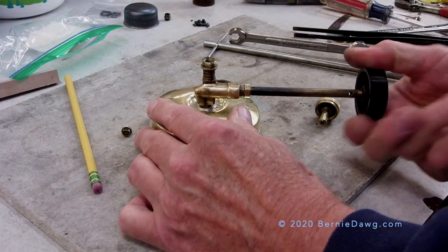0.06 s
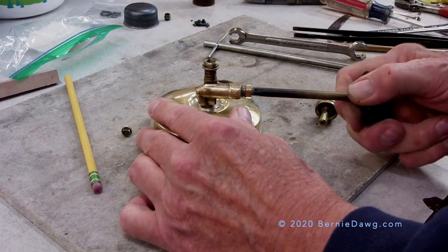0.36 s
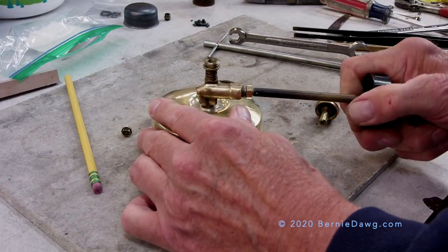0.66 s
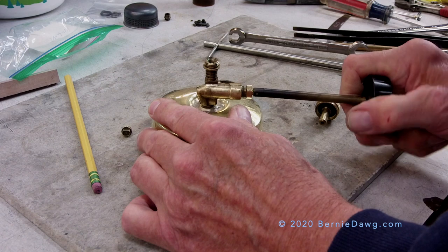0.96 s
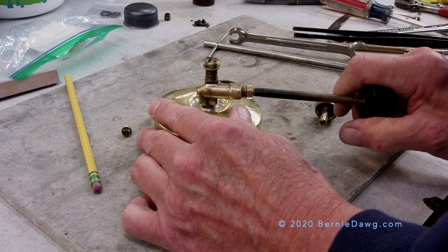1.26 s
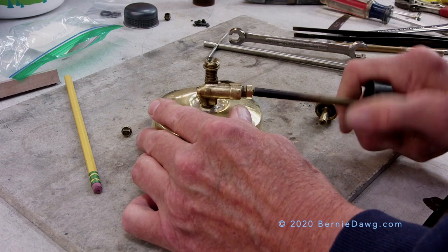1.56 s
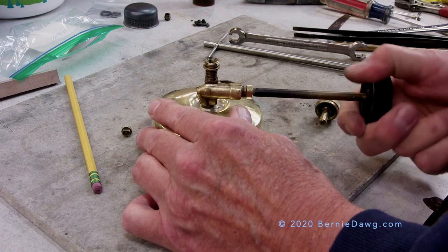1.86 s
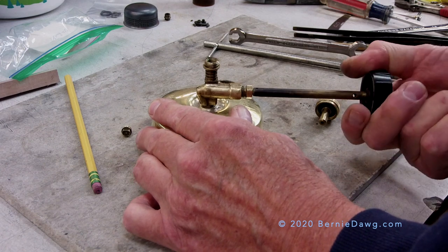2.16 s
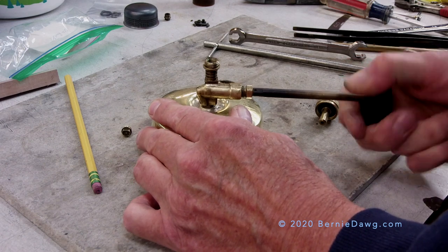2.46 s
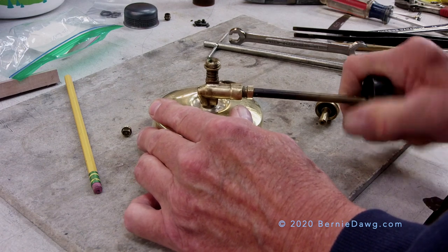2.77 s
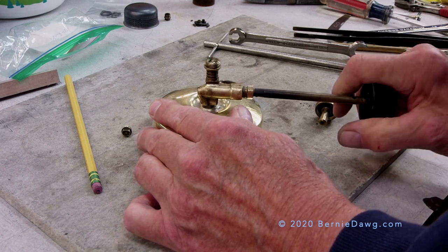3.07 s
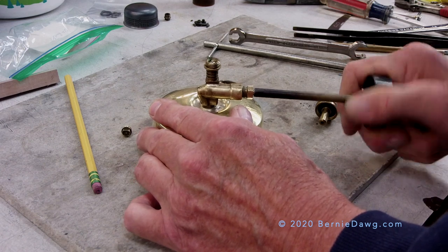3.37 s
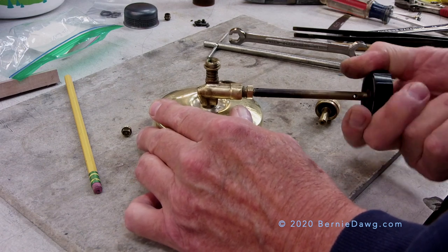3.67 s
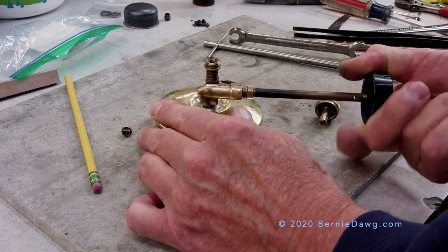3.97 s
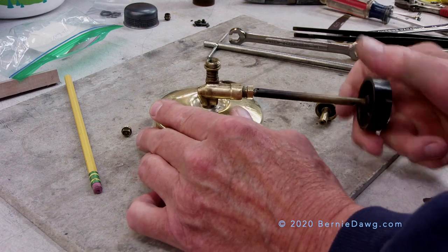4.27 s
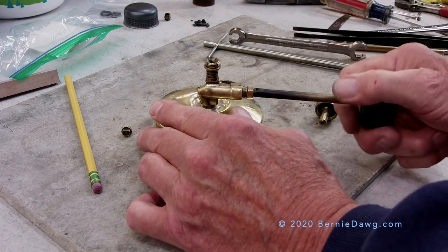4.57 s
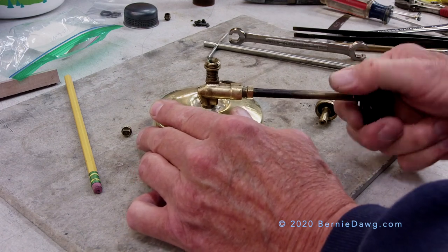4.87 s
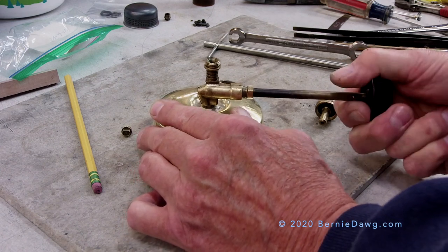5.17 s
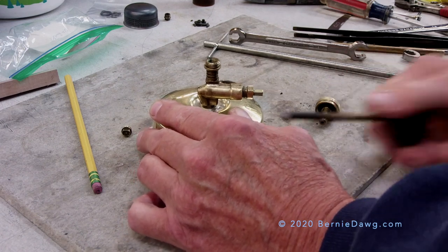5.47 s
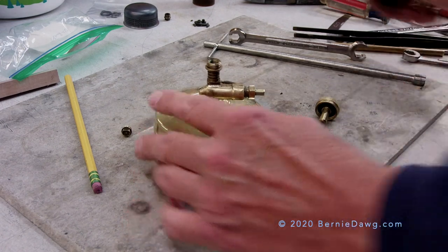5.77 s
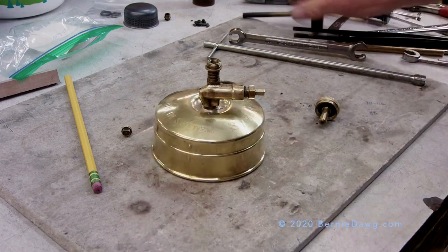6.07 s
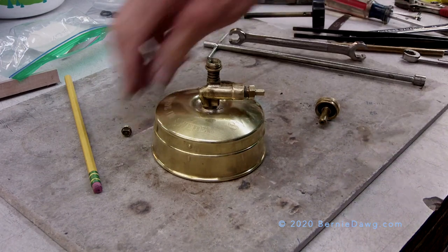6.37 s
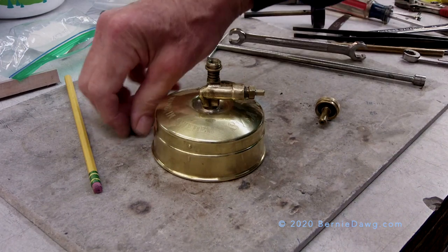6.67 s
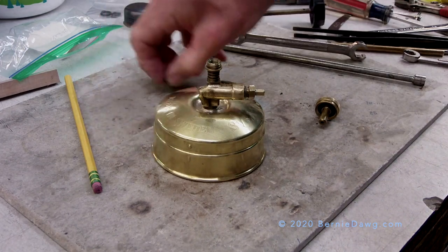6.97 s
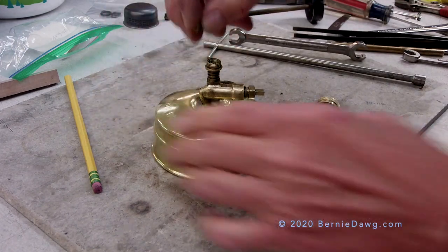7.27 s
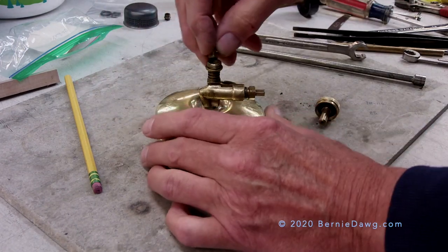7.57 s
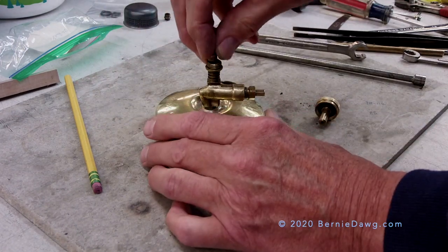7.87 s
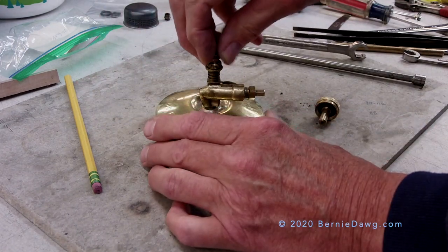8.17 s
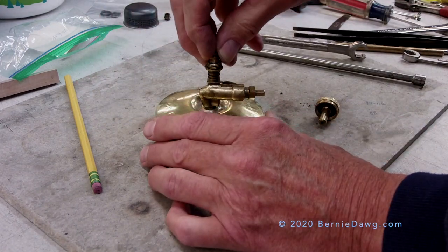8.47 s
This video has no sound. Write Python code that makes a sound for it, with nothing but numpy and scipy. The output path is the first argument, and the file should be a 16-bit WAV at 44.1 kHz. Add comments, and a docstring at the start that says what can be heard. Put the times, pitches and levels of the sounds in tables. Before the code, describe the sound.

High metal squeaks from a turning brass valve, a sharp clatter of tools and a few small clicks in a quiet workshop.

```python
"""Brass stove on a workbench

A quiet workshop, one microphone close to the bench. A key turns the spindle of a small brass stove;
it sticks and slips, squeaking at each twist of the wrist. Dropped among the tools, the key chatters
on steel and bounces on the bench. Fingers fit a small cap with two clicks and a chirp.
The walls answer briefly; room hum and microphone hiss lie underneath."""
import sys
import numpy as np
from scipy import signal
from scipy.fft import rfft, irfft, next_fast_len
from scipy.io import wavfile
from scipy.ndimage import uniform_filter1d

SR = 44100
rng = np.random.default_rng(int(sys.argv[2]) if len(sys.argv) > 2 else 0)


def master(y):
    """Save y as 16-bit WAV."""
    cut = np.clip(np.atleast_2d(y).T, -1, 1)
    pcm = np.round(cut * 32767)  # scale
    wavfile.write(sys.argv[1], SR, pcm.astype(np.int16))


N = 380583

# low rumble of the workshop: (frequency [Hz], relative level [dB])
RUMBLE_SPECTRUM = [(8.8, -5), (15, 7), (76, -9), (92, -13), (123, -5.5), (149, -16.5), (180, -11),
                   (214, -14.5), (281, -10), (315, -13.5), (412, -8), (520, -16), (735, -18), (1500, -22.5),
                   (1950, -38), (3300, -120)]
# the microphone's own hiss: (frequency [Hz], relative level [dB])
HISS_SPECTRUM = [(1450, -15), (1650, -4), (1900, -8), (2300, -5), (3500, -7.5), (5000, -6.5), (7000, -0.5),
                 (8500, 2), (9100, 1), (9600, -10), (12000, -9.5), (13000, -17.5), (15000, -23)]
# narrow hums and whines in the room: (frequency [Hz], width [Hz], level [dB])
ROOM_HUMS = [(31.2, 22, -70), (120.5, 7.8, -75), (185.4, 5.1, -78.5), (276.2, 6, -74.5),
             (372.4, 5.6, -73.5), (447, 55, -70.5), (562, 10, -75.5), (751, 66, -71.5), (2829, 72, -69),
             (8920, 33, -65.5)]
# one row a squeak, the last two from the cap: (level offset [dB], brightness [dB], whistle [dB],
# roughness [0-1], opening rasp [0-1], path of (time [s], slip rate [Hz]))
SQUEAKS = [ (-3.5, -1.5, 0, 0.52, .6, [(.633, 3955), (.645, 3984), (.654, 3515), (.665, 1730), (.682, 975),
           (.69, 756)]), (-2, -8, -3, 0.37, 0.45, [(.759, 1215), (.776, 2395), (.791, 2392), (.823, 956),
           (.84, 733)]), (-0.5, -1.5, 1, .35, 0.69, [(.875, 1173), (.893, 1766), (.92, 1864), (.942, 998),
           (.957, 717)]), (0, 0, 0.5, .38, 0.595, [(1.035, 1402), (1.055, 1807), (1.074, 1790),
           (1.087, 1477), (1.12, 1110), (1.145, 1615), (1.165, 2560), (1.192, 3260), (1.25, 3370),
           (1.28, 3188), (1.32, 2218), (1.368, 738)]), (3, 7.5, 9, 0.44, .8, [(1.831, 4245), (1.875, 4370),
           (1.903, 4010), (1.918, 3060), (1.937, 2800), (1.96, 3330), (1.985, 3986), (2.031, 3910)]),
           (0, -2, 8.5, 0.52, 0.66, [(2.037, 3290), (2.05, 3220), (2.083, 3986)]),
           (-0.5, 0, 1.5, .58, 0.74, [(2.789, 4004), (2.806, 4100), (2.819, 2362), (2.833, 1457),
           (2.857, 2540), (2.877, 3340), (2.915, 3827), (2.968, 3890), (2.995, 3712), (3.022, 3270),
           (3.078, 1820), (3.112, 809)]), (1.5, 6.5, 6, .5, 0.47, [(3.548, 3425), (3.56, 4440),
           (3.575, 4430), (3.606, 4000), (3.615, 3050), (3.63, 4230), (3.65, 4200)]),
           (6, 0, -2, .5, 0.1, [(3.673, 4340), (3.688, 4370), (3.697, 3927), (3.734, 4120)]),
           (1.5, -17, 1, .15, .45, [(3.737, 3990), (3.763, 3950)]), (-2.5, -1, 1, .45, .3, [(8.134, 4650),
           (8.143, 4520)]), (-6.5, -2, 5, 1, .6, [(8.161, 4120), (8.182, 4550)])]
# how the metal answers the slips: (slip rate [Hz], level [dB], upper over lower resonances [dB])
SLIP_RESPONSE = [(730, -48.5, -8), (1070, -44, -2.5), (1800, -42.5, 0.5), (2560, -42.5, 8),
                 (2800, -39, -17), (3260, -36.5, -20.5), (3360, -39, -2.5), (3880, -37, -2),
                 (4050, -40, 11), (4500, -42, 23), (4450, -40, 10)]
# resonances of spindle and valve: (frequency [Hz], width [Hz], gain [dB])
SPINDLE_MODES = [(1110, 1900, 4.5), (3020, 190, 2), (3130, 214, 16.5), (3660, 510, 1.5), (4500, 91, 9.5),
                 (7040, 690, 3), (7183, 480, 17), (7870, 220, 10), (8800, 540, 17), (11370, 500, -41)]
# overall tone colour of the squeaks at the microphone: (frequency [Hz], gain [dB])
SQUEAK_COLOUR = [(800, 6), (1150, 3), (1450, -2.5), (1900, -7.5), (2700, -1), (9000, -1), (10200, 1),
                 (12000, -0.5), (12800, -13), (15000, 6)]
# fingers grip, brush and nudge: (time [s], level [dB], centre [Hz], width [octaves], length [s])
FINGER_TOUCHES = [(2.533, -51, 478, 0.18, 0.022), (2.771, -45.5, 364, 1.2, 0.023),
                  (4.47, -55, 2500, 1.2, 0.01), (4.495, -55.5, 900, 2.2, 0.022),
                  (5.569, -53, 4400, 0.33, .015), (5.902, -56.5, 5070, 0.081, 0.021),
                  (6.673, -56.5, 3430, 1, 0.025), (6.735, -49.5, 3720, 0.93, 0.013),
                  (6.821, -55, 2660, 1.1, 0.05), (7.933, -51.5, 460, 0.92, 0.098),
                  (8.021, -44.5, 3600, .6, 0.036), (8.129, -47, 9900, .12, 0.024)]
# the key's tip rings as it lands: (frequency [Hz], relative level [dB], t60 [s])
KEY_TIP_MODES = [(7800, -12, .008), (8670, 13, 0.013), (12100, -7, 0.027)]
# modes of the bench: (frequency [Hz], relative level [dB], t60 before the ring factor [s])
BENCH_MODES = [(85, -24, 0.1), (149, -19, 0.15), (253, -8.5, 0.025), (385, -8.5, 0.036), (476, -1, 0.027),
               (787, 6, 0.013), (1064, -0.5, .02), (1197, -3, 0.024), (1634, -3.5, 0.025),
               (2480, -3, 0.0095)]
# the key strikes the tools, steel on steel: (time [s], peak level [dB])
STEEL_BLOWS = [(6.1720, -3.5), (6.213, -10), (6.2456, -27), (6.2604, -20), (6.2697, -38), (6.2940, -21.5),
               (6.3284, -31), (6.3374, -27)]
# colour of the steel: (frequency [Hz], gain [dB])
STEEL_COLOUR = [(1200, -2), (2300, -11), (2900, -9.5), (3400, -8.5), (3900, 1.5), (4500, 1), (5300, -8.5),
                (6500, -10.5), (7700, -11.5), (8700, -9), (10000, -31), (12400, -18), (15000, -15)]
# the cap meets the stove: (time [s], peak level [dB], brightness limit [Hz], ring factor [ratio])
CAP_CLICKS = [(7.9421, -25.5, 2000, 1.0), (7.953, -31, 4000, .15), (8.0055, -32, 7000, 0.097),
              (8.0080, -20.5, 4470, 0.058), (8.015, -30, 8000, 0.19), (8.031, -32, 3500, 0.2)]
# modes of the cap and its seat: (frequency [Hz], relative level [dB], t60 before the ring factor [s])
CAP_MODES = [(825, -17, 0.059), (1648, -1.5, 0.07), (2300, -6, 0.052), (2886, -2, 0.072), (3580, 0, 0.024),
             (4930, -8, .012), (6500, 0, 0.06), (7030, 8.5, 0.065), (8400, 6, 0.03)]
# decay of the workshop's reflections: (frequency [Hz], t60 [s])
WORKSHOP_DECAY = [(150, 0.22), (700, 0.46), (2000, 0.39), (4000, 0.27), (8000, 0.2), (14000, 0.93)]
# colour of those reflections at the microphone: (frequency [Hz], gain [dB])
WORKSHOP_COLOUR = [(100, -3), (300, 4.5), (700, -4), (1200, 4), (1450, 2), (1700, 5), (2200, 5.5),
                   (3000, -3), (4000, -0.5), (5500, 1.5), (8500, 7), (10000, -4.5), (12000, -7),
                   (14000, -18)]

BAND_LIMIT_HZ = 15200


def amp(db):
    """Decibels to gain."""
    return 10 ** (np.asarray(db) / 20)


def unit(x):
    """Scales to rms 1."""
    return x / np.sqrt(np.mean(x ** 2) + 1e-20)


def read(points, hz):
    """Reads a table on a log-frequency axis."""
    f, value = np.transpose(points)
    return np.interp(np.log(hz + 1), np.log(f + 1), value)


def add(mix, s, sound):
    """Mixes a sound in at time s."""
    part = mix[round(s * SR):][:len(sound)]
    part += sound[:len(part)]


def lowpass(hz, edge_hz, order=2):
    """Gain of a smooth low-pass."""
    return 1 / np.sqrt(1 + (hz / edge_hz) ** (2 * order))


def noise(gain, count=N):
    """Noise of rms 1 with the given spectrum."""
    return unit(irfft(rfft(rng.standard_normal(count)) * gain, count))


def waver(count, rate_hz):
    """Random drift of rms about 1, up to the given rate."""
    size = next_fast_len(2 ** 14 + count)
    return noise(lowpass(np.fft.rfftfreq(size, 1 / SR), rate_hz), size)[:count]


def room_tone(rumble_db=-57, hiss_db=-55):
    """The still workshop: low rumble, narrow hums and the microphone's hiss."""
    f = np.fft.rfftfreq(N, 1 / SR)
    rumble = amp(rumble_db) * noise(amp(read(RUMBLE_SPECTRUM, f)) * lowpass(f, 1228, order=8))
    hiss = amp(hiss_db) * noise(amp(read(HISS_SPECTRUM, f)) * (1 - lowpass(f, 720, order=8)))
    hums = sum(amp(db) * noise(lowpass(f - hz, width / 2)) for hz, width, db in ROOM_HUMS)
    return rumble + hiss + hums


def twist(level_db, bright_db, whistle_db, roughness, rasp, path,
          break_s=0.015, fray_octaves_per_s=6.86, steady_smoothing=0.802, steady_db=2):
    """One twist of the wrist: a steady slip rate runs clean and loud, a gliding one frays."""
    times, rates = np.transpose(path)
    t = np.arange(times[0], times[-1] + 0.0025, 1 / SR)
    hz = np.interp(t, times, rates)
    breaking_loose = np.exp(-(t - t[0]) / break_s)
    glide = uniform_filter1d(abs(np.gradient(np.log2(hz))) * SR, size=400)
    steady = 1 - np.tanh(glide / fray_octaves_per_s)
    stumble = 0.45 * lowpass(hz, 1130, order=4)  # slow slips are rougher
    rough = roughness * (1 - steady_smoothing * steady) + rasp * breaking_loose + stumble
    at_hz, loud_db, upper_db = np.transpose(SLIP_RESPONSE)
    db = level_db + np.interp(hz, at_hz, loud_db) + steady_db * steady * (1 - breaking_loose)
    # the opening rasp excites all resonances alike
    tilt_db = (bright_db + np.interp(hz, at_hz, upper_db)) * (1 - rasp * breaking_loose)
    return t, hz, db, tilt_db, np.clip(rough, 0.06, 1), amp(whistle_db)


def stick_slip(hz, rough, whistle, drain=0.21, wander=0.0273, uneven=0.61, grit=0.17, scrape=0.29):
    """The force of sticking and slipping: a pulse train whose overtones fray in rough stretches."""
    n = len(hz)
    # slow slips come irregularly; quick ones lock to the metal and run steadily
    jitter = 120 / hz * waver(n, 700)
    cycles = np.cumsum(hz * (1 + rough * (jitter + wander * waver(n, 113)))) / SR
    edge_hz = 8500 * (1 + 0.15 * rough)  # smooth sliding has rounder slips
    edge_hz /= 1 + drain * rough * whistle ** 2  # a whistling upper mode drains the overtones
    slips = np.zeros(n)
    for k in range(1, 19):
        gain = lowpass(k * hz, edge_hz, order=5) * (k * hz < BAND_LIMIT_HZ)
        slips += gain * np.cos(2 * np.pi * k * cycles)
    rasp = rng.standard_normal(n + 1)
    friction = rough * (grit * rasp[:n] + scrape * np.diff(rasp))
    return cycles, unit(slips) * (1 + uneven * rough * waver(n, 590)) + friction


def free_modes(cycles, hz, whistle, throb=0.4, chime=0.14, slack_hz=6850, tighten=0.36):
    """Modes break free of the slips: one whistles, higher as the slips quicken; others flare by turns."""
    n = len(hz)
    whistle_hz = slack_hz + tighten * hz + 80 * waver(n, 65)
    singing = np.sin(2 * np.pi * np.cumsum(whistle_hz) / SR) * (1 + throb * np.cos(2 * np.pi * cycles))
    flares = sum(waver(n, 29) * np.sin(2 * np.pi * np.cumsum(mode_hz + 40 * waver(n, 44)) / SR)
                 for mode_hz, _, _ in SPINDLE_MODES[1:])
    return whistle * singing + chime * flares


def squeak(t, hz, db, tilt_db, rough, whistle, flutter_db=3.5, split_hz=6300, ripple=0.36, tank_s=0.0048):
    """Each slip kicks the resonances of the brass. Returns the start time and the sound."""
    n = len(t)
    cycles, drive = stick_slip(hz, rough, whistle)
    drive += rough * free_modes(cycles, hz, whistle)
    size = next_fast_len(n + 2048)
    f = np.fft.rfftfreq(size, 1 / SR)
    body = sum(amp(gain_db) * 1j * f * width / (mode_hz ** 2 - f ** 2 + 1j * f * width)
               for mode_hz, width, gain_db in SPINDLE_MODES)
    # the tank's many small modes make each gliding overtone stutter
    tank = rng.standard_normal(size) * np.exp(-np.arange(size) / SR / tank_s)
    body *= 1 + ripple * rfft(tank) / np.linalg.norm(tank)
    ringing = rfft(drive, size) * body * amp(read(SQUEAK_COLOUR, f))
    # the grip shares the energy between the lower and the upper resonances
    lower = lowpass(f, split_hz, order=8)
    upper = np.sqrt(1 - lower ** 2)
    upper_share = 1 / (1 + amp(-2 * tilt_db))
    sound = np.zeros(n)
    for band, share in (lower, 1 - upper_share), (upper, upper_share):
        part = irfft(ringing * band, size)[:n]
        power = abs(uniform_filter1d(part ** 2, size=300)) + 1e-12
        flutter = amp(flutter_db * np.sqrt(rough) * waver(n, 60))
        sound += part * np.sqrt(share / power) * flutter
    fade = np.clip(np.minimum((t - t[0]) / 0.0006, (t[-1] - t) / 0.0012), 0, 1)
    return t[0], sound * amp(db) * fade


def finger_touch(db, hz, octaves, length_s):
    """A soft scuff near the microphone: a quick swell of grainy noise that dies away."""
    t = np.arange(SR // 2) / SR
    f = np.fft.rfftfreq(len(t), 1 / SR)
    grains = rng.standard_normal(len(t)) * rng.exponential(1, len(t))
    band = np.exp(-0.5 * (np.log2((f + 1) / hz) / octaves) ** 2)
    scuff = unit(irfft(rfft(grains) * band, len(t)))
    age = 3 * t / length_s
    return amp(db) * scuff * age * np.exp(1 - age)


def strike(modes, peak_db, bright_hz, ring, crack, crack_s=0.0022, rise_s=0.0004, thin_hz=700):
    """A knock on key tip, bench or cap: a crack of contact, then modes whose decay time ring scales."""
    t = np.arange(SR // 4) / SR
    f = np.fft.rfftfreq(len(t), 1 / SR)
    colour = lowpass(f, bright_hz) * (1 - lowpass(f, thin_hz))
    sound = crack * noise(colour, len(t)) * np.exp(-t / crack_s)
    for k, (hz, db, t60) in enumerate(modes):
        swing = (-1) ** k * np.sin(2 * np.pi * hz * t * rng.uniform(1.0, 1.008))
        sound += amp(db - 60 * t / (t60 * ring)) * lowpass(hz, bright_hz, order=1) * swing
    sound *= 1 - np.exp(-t / rise_s)
    return amp(peak_db) * sound / abs(sound).max()


def steel_chatter(peak_db, centre_hz=4500, buzz=0.07, buzz_s=0.0037, low_hz=2400):
    """A blow runs along thin steel: high bending waves arrive first, so the click falls in pitch."""
    t = np.arange(2048) / SR
    f = np.fft.rfftfreq(len(t), 1 / SR)
    delay_s = 0.0048 * (np.sqrt(centre_hz / np.maximum(f, 500)) - 1)
    phase = -2 * np.pi * np.cumsum(delay_s) * f[1]
    bright_hz = 5900 + 17000 * amp(peak_db) ** 2  # harder blows are brighter
    low_cut = np.sqrt(1 - lowpass(f, low_hz, order=3) ** 2)
    gain = amp(read(STEEL_COLOUR, f)) * lowpass(f, bright_hz, order=6) * low_cut
    # the contact buzzes for an instant after the first touch
    contact = 1 + rfft(buzz * rng.standard_normal(len(t)) * np.exp(-t / buzz_s))
    chirp = np.fft.fftshift(irfft(gain * contact * np.exp(1j * phase)))
    return amp(peak_db) * chirp / abs(chirp).max()


def handle_bounces(start_s=6.1787, flight_s=0.0648, rebound=0.735, first_db=-12.5, loss_db=3.7, count=7):
    """The key's handle knocks on the bench, ever sooner and softer: (time [s], peak level [dB])."""
    k = np.arange(count)
    return zip(start_s + flight_s * (1 - rebound ** k) / (1 - rebound), first_db - loss_db * k)


def steel_rattle(start_s=6.352, gap_s=0.01, uneven=0.212, peak_db=-35.5, spread_db=0.5, count=5):
    """Faint uneven ticks as the steel comes to rest: (time [s], peak level [dB])."""
    late, soft = rng.standard_normal((count, 2)).T
    return zip(start_s + gap_s * (np.arange(count) + uneven * late), peak_db - spread_db * soft)


def workshop_reflections(sound, gap_s=0.0025, echoes_per_s=4000):
    """Dense reflections reach the microphone from bench and walls, each band dying at its own speed."""
    t = np.arange(SR * 3 // 4) / SR
    echoes = rng.choice([-1., 1.], len(t)) * (rng.random(len(t)) < echoes_per_s / SR) * (t > gap_s)
    hz, age, bands = signal.stft(echoes, SR, nperseg=256)
    bands *= amp(-60 * age / read(WORKSHOP_DECAY, hz)[:, None])
    norm = np.linalg.norm(signal.istft(bands, SR, nperseg=256)[1])
    tail = signal.istft(bands * amp(read(WORKSHOP_COLOUR, hz))[:, None], SR, nperseg=256)[1]
    return signal.fftconvolve(sound, tail / norm)[:N]


def scene(landing_s=6.1695):
    """Stove, key and cap close to one microphone in a small room; both channels are alike."""
    squeaks, fingers, steel, bench, cap = np.zeros((5, N))
    for row in SQUEAKS:
        add(squeaks, *squeak(*twist(*row)))
    for s, *shape in FINGER_TOUCHES:
        add(fingers, s, finger_touch(*shape))
    # the dropped key lands tip first, with a thud from the bench
    add(steel, landing_s, strike(KEY_TIP_MODES, peak_db=-15, bright_hz=14000, ring=1.0, crack=1.0))
    for s, db in [(landing_s, -22), *handle_bounces()]:
        add(bench, s, strike(BENCH_MODES, db, bright_hz=3000, ring=0.71, crack=0.076))
    for s, db in [*STEEL_BLOWS, *steel_rattle()]:
        chirp = steel_chatter(db)
        add(steel, s - len(chirp) / 2 / SR, chirp)
    for s, db, bright_hz, ring in CAP_CLICKS:
        add(cap, s, strike(CAP_MODES, db, bright_hz, ring, crack=0.71))
    direct = squeaks + fingers + steel + bench + cap
    into_room = amp(-5.5) * (squeaks + fingers) + amp(-6) * steel + amp(-0.5) * bench + amp(-8.5) * cap
    mono = direct + workshop_reflections(into_room) + room_tone()
    return np.array([mono, mono])


def record(dry):
    """The recorder rounds off the loudest peak and cuts the treble above its band limit."""
    ceiling = 0.56
    limited = dry / (1 + (dry / ceiling) ** 6) ** (1 / 6)
    treble_cut = signal.firwin(401, BAND_LIMIT_HZ, window=("kaiser", 8), fs=SR)
    return signal.oaconvolve(limited, treble_cut[None], "same")


dry = scene()
out = record(dry)
master(out)
```